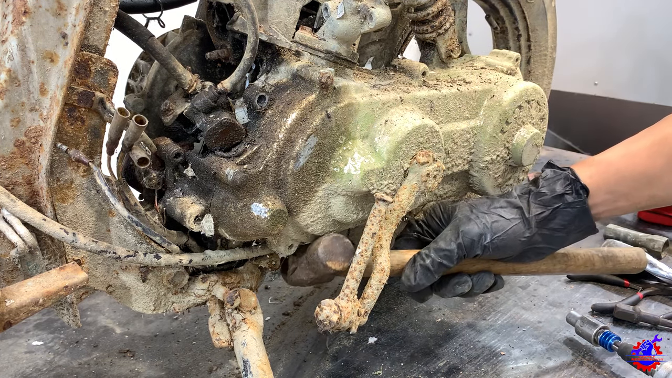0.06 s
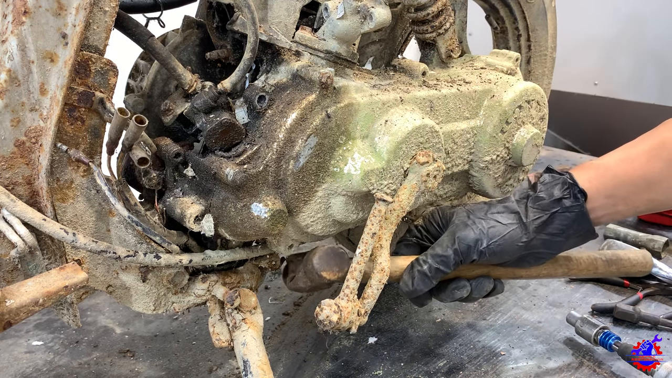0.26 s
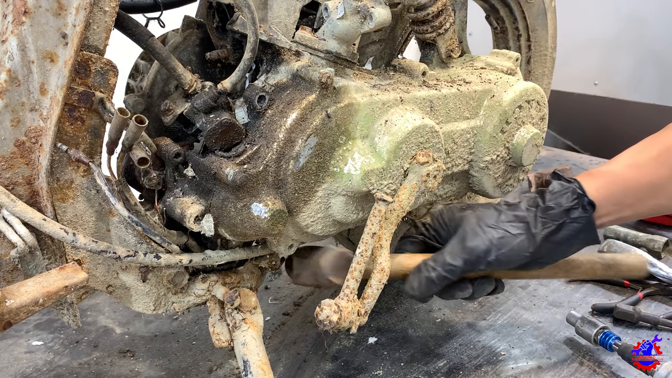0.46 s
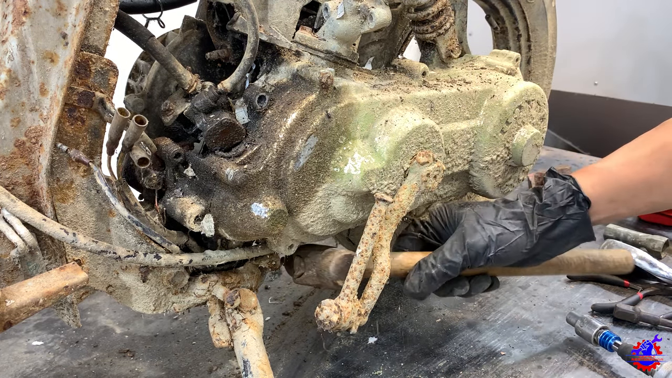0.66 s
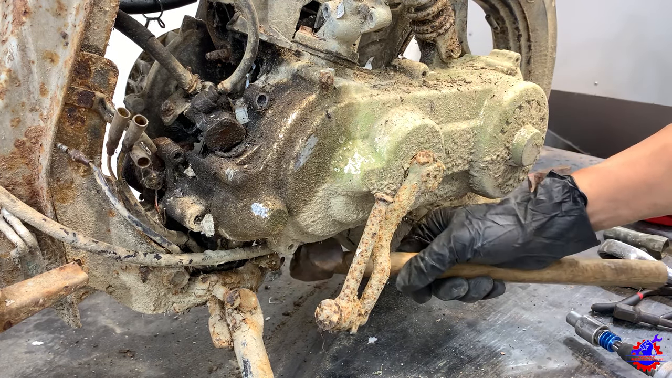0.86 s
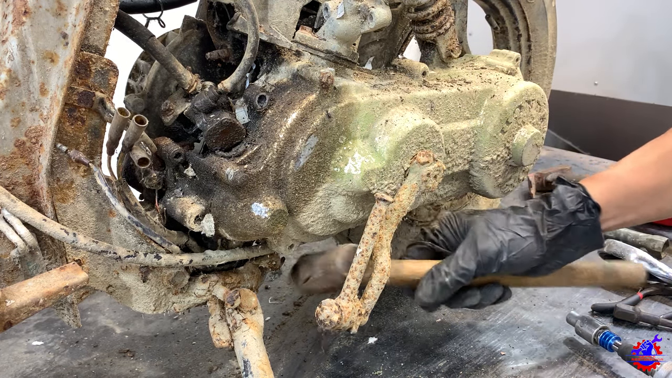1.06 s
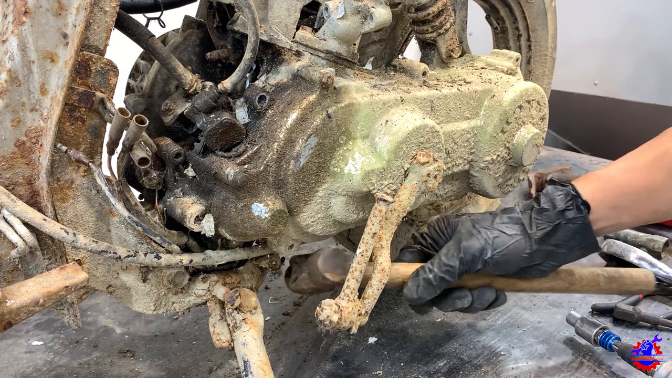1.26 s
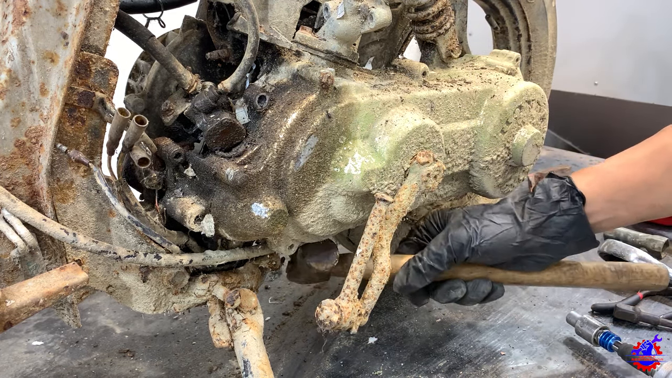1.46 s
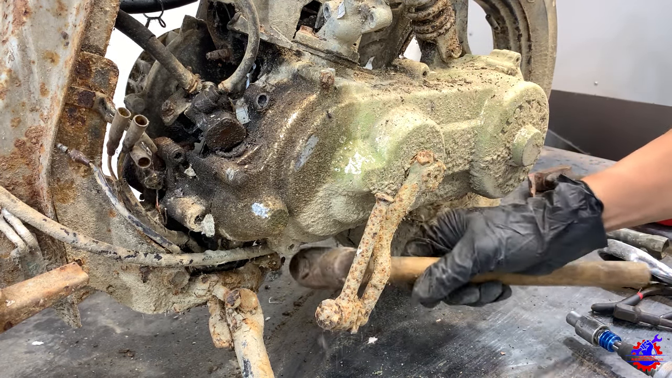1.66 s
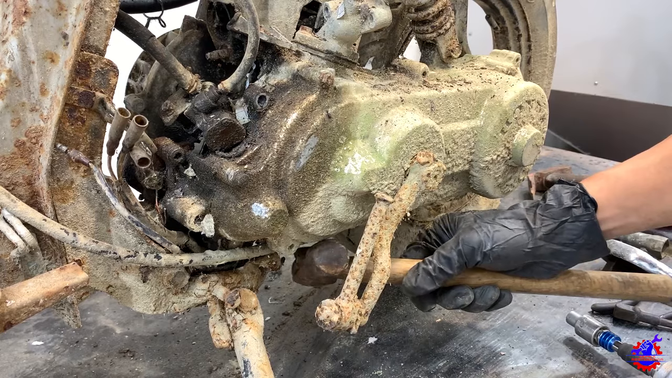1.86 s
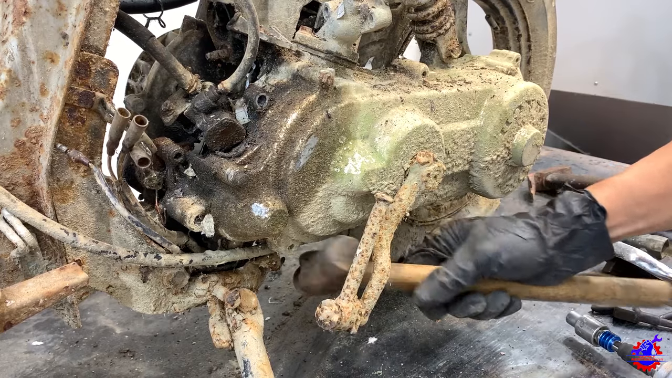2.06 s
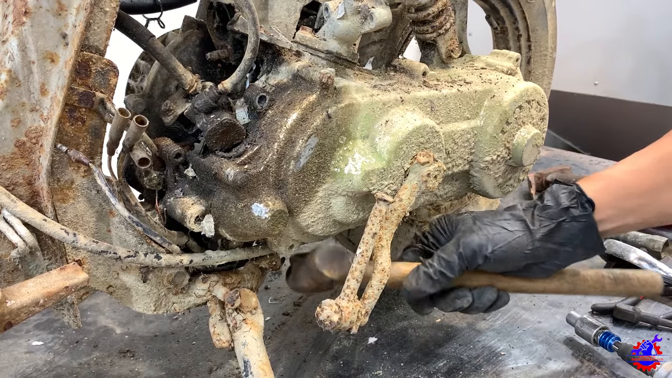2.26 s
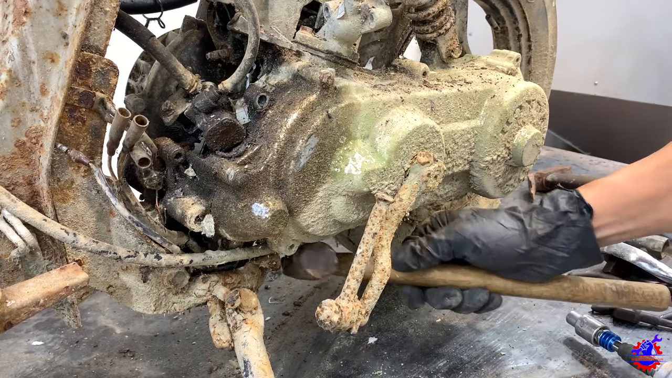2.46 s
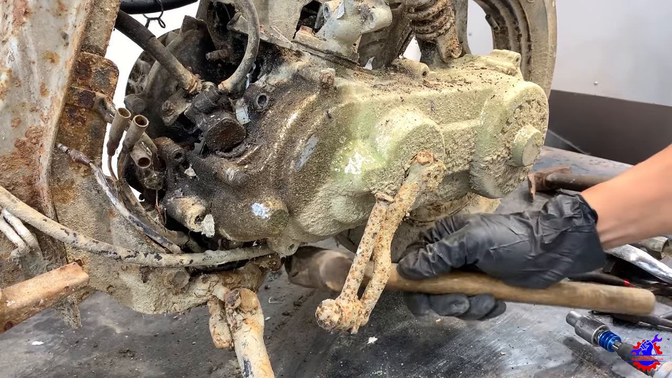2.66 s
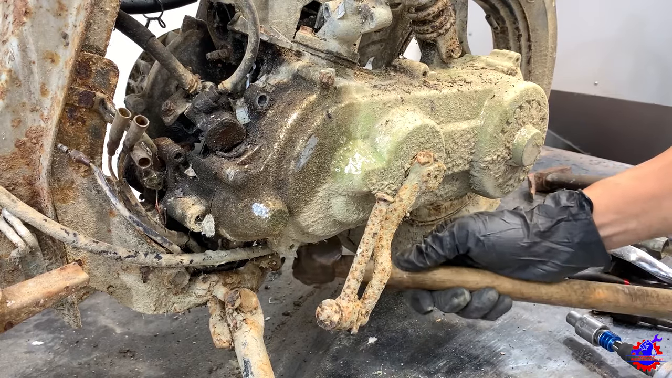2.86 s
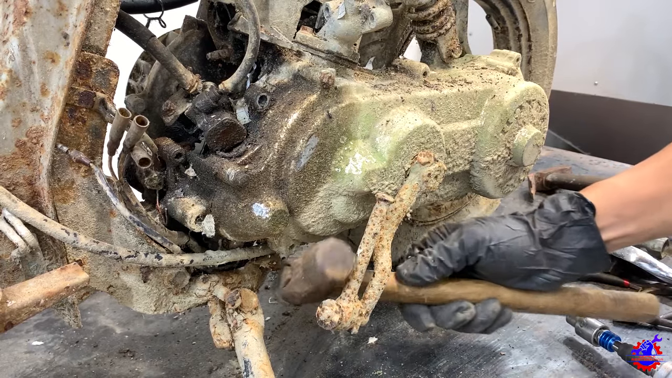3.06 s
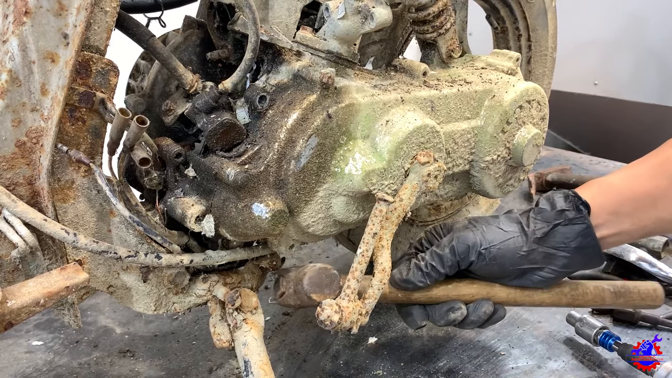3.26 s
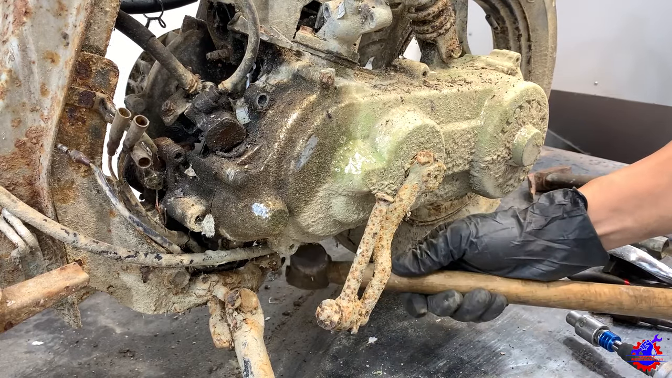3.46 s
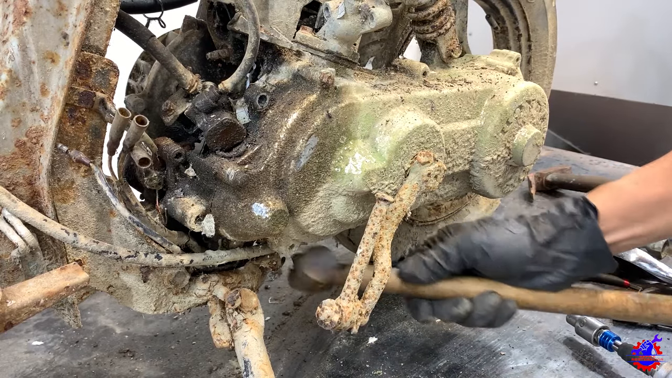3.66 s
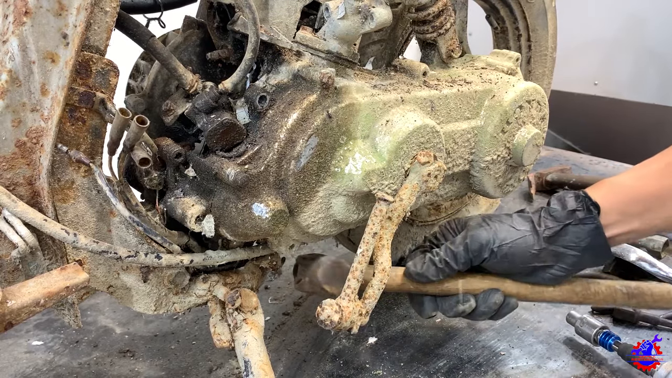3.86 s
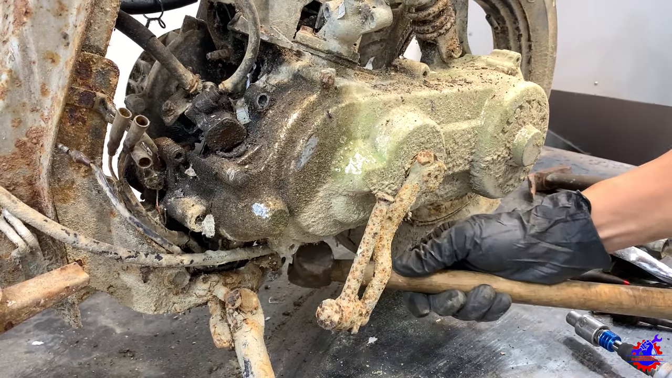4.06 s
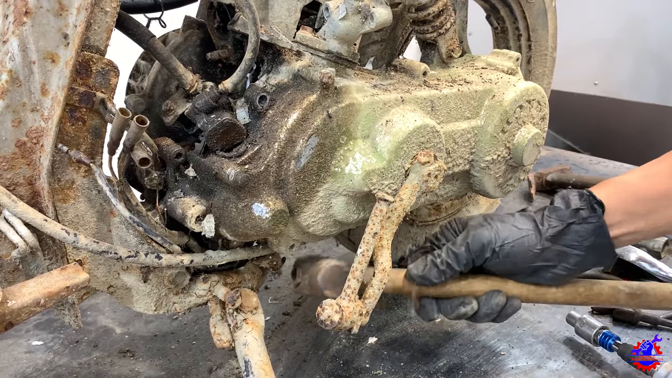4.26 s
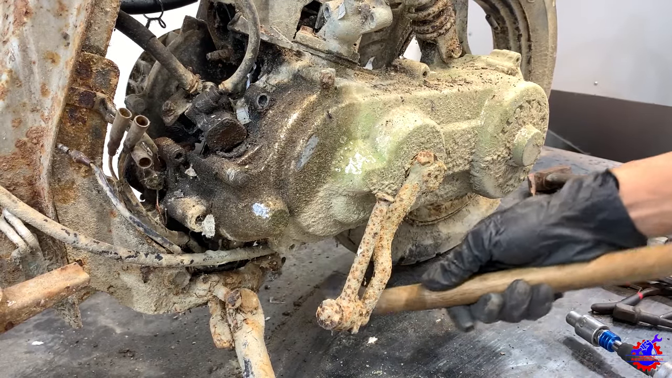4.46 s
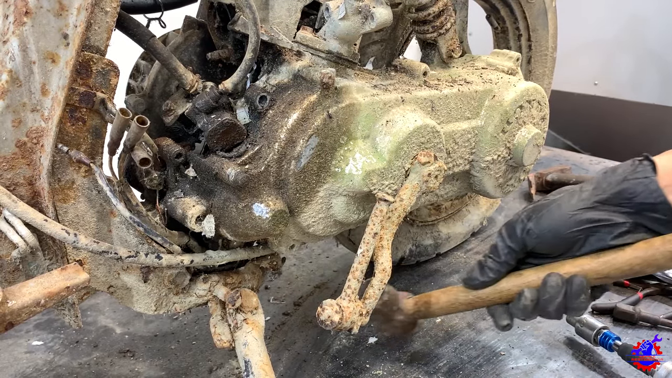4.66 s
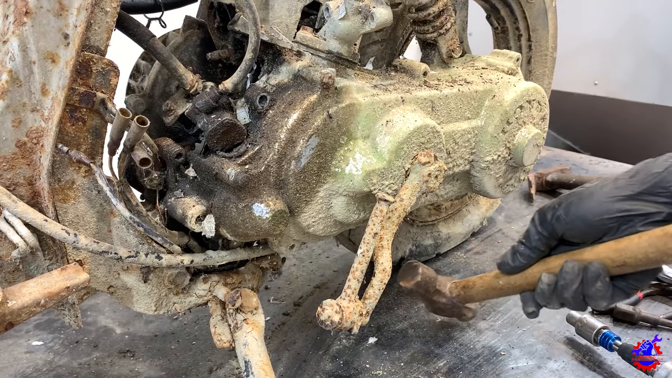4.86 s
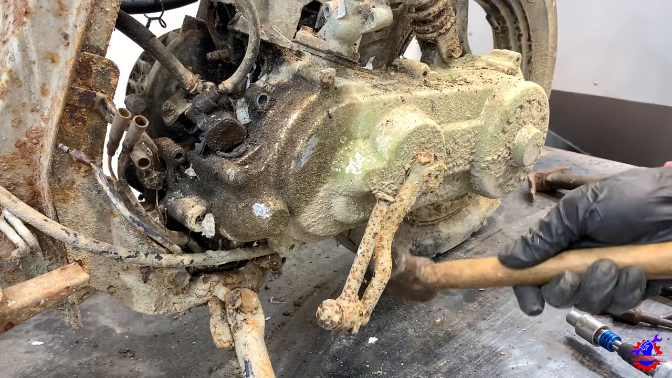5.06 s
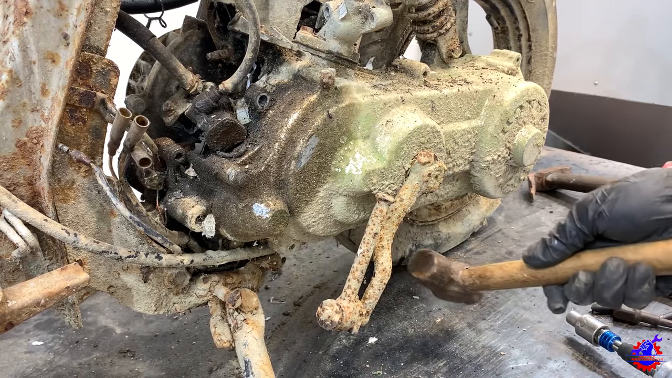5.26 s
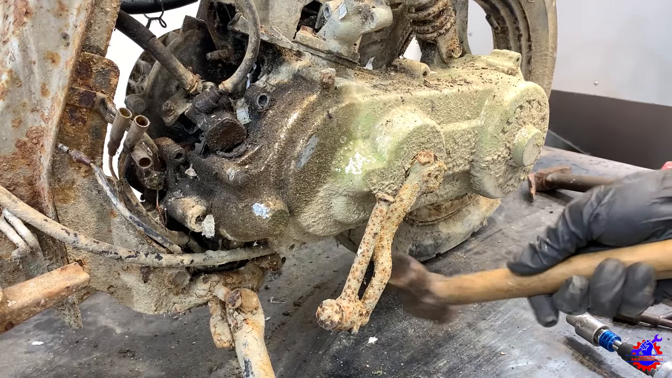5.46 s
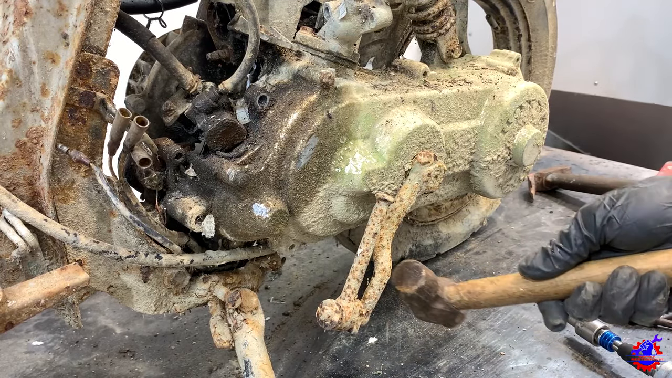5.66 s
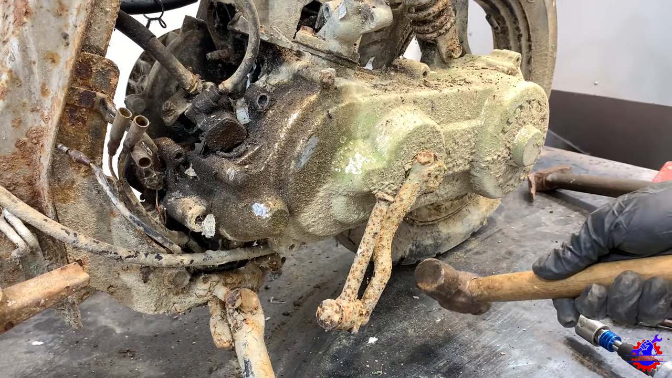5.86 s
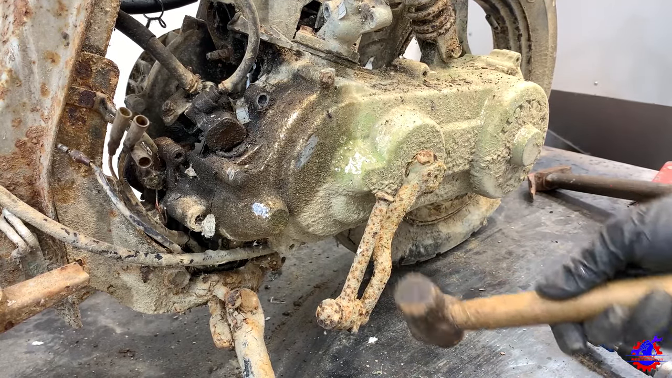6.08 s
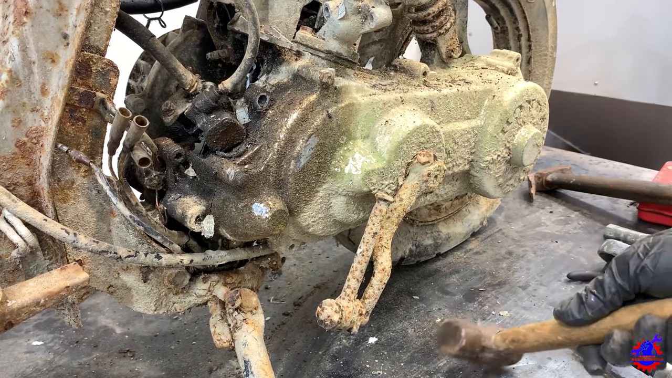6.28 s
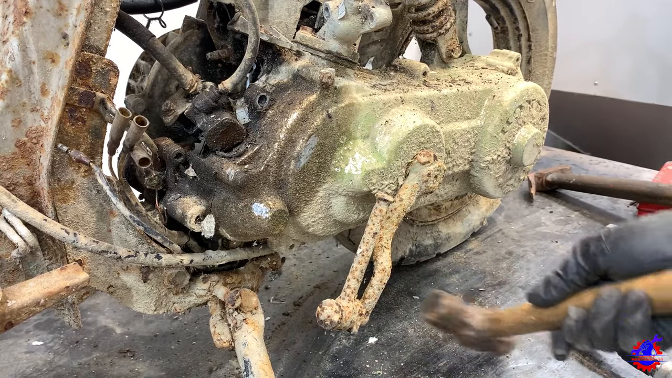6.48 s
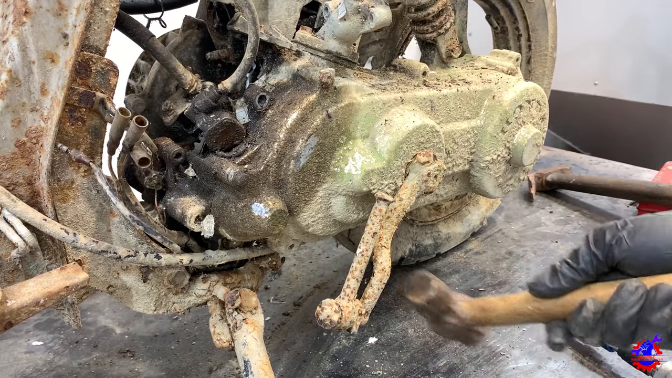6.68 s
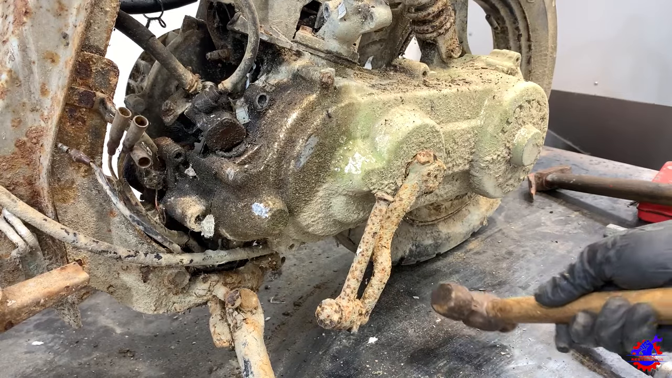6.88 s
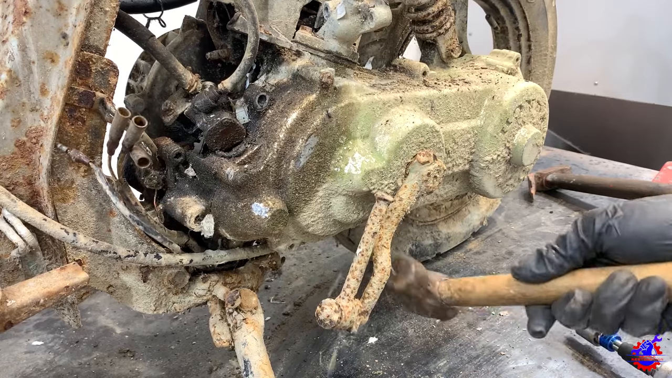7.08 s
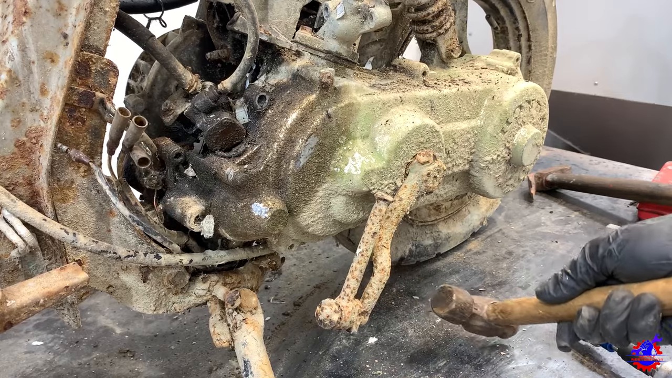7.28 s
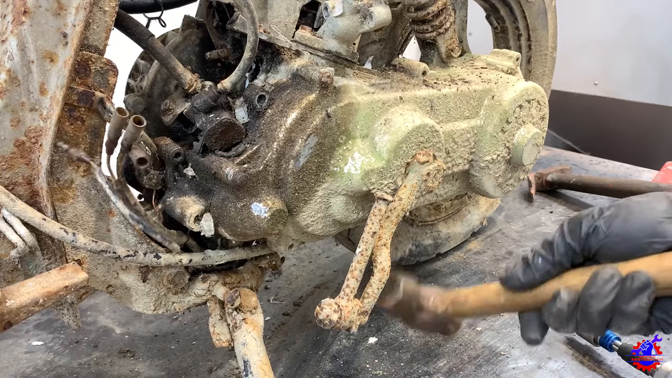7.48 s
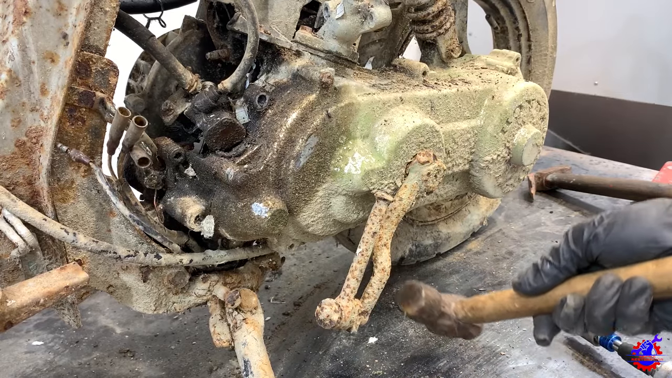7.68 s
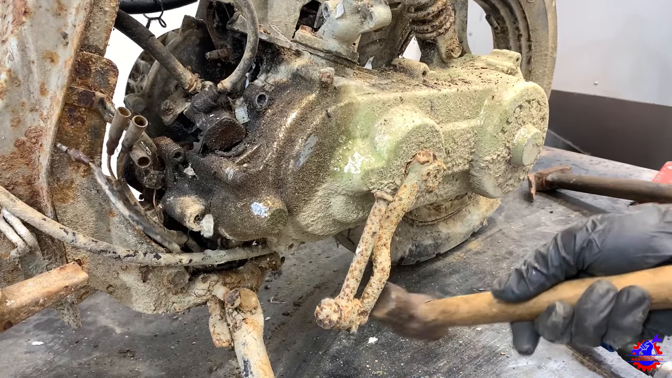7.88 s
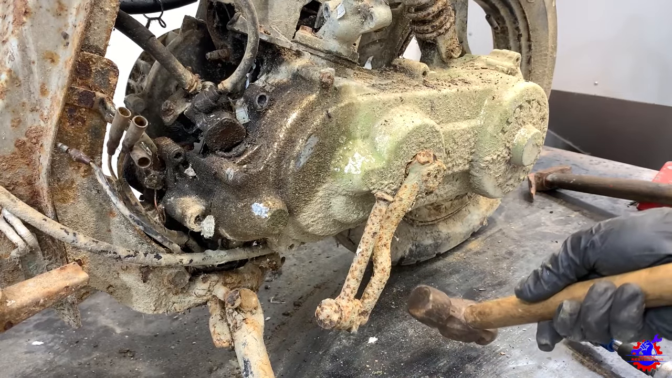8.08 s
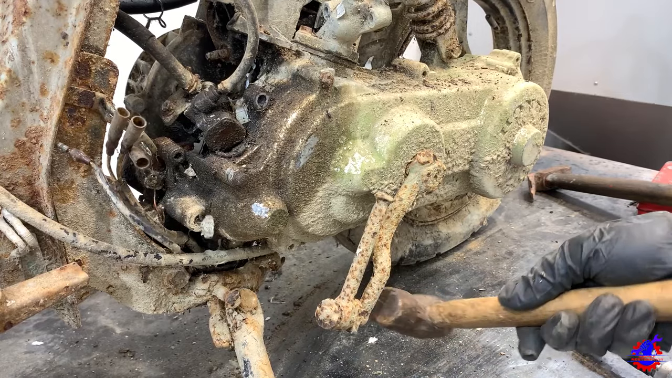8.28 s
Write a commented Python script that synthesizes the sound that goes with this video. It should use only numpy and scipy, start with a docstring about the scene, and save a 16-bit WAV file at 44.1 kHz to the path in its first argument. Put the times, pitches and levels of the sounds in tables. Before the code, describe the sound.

A hammer bangs a rusted steel lever on an engine casing, sixteen hard clanking blows half a second apart, in a ringing workshop, close and overloaded.

```python
"""In a workshop, a hammer beats a rusted lever on an engine casing: eight blows from behind, then eight from the front.
Each blow is a rattling noise burst that drives the steel, with its strong tones set by where the head lands.
A late boom shakes the bench and a loose part sings faintly; lighter knocks and ticks of grit fall around the blows.
Fading noise makes the room ring on, over quiet air. The close microphone overloads and its limiter ducks the tails."""
import sys
import numpy as np
from scipy import signal
from scipy.fft import rfft, irfft
from scipy.io import wavfile
from scipy.ndimage import uniform_filter1d, minimum_filter1d

SR = 44100
rng = np.random.default_rng(int(sys.argv[2]) if len(sys.argv) > 2 else 0)


def file_out(sig):
    """Save sig as 16-bit WAV at sys.argv[1]."""
    # one column per channel
    cols = np.atleast_2d(sig).T
    # limit, then scale
    lim = np.clip(cols, -1, 1)
    pcm = np.round(lim * 32767).astype(np.int16)
    wavfile.write(sys.argv[1], SR, pcm)


N = 367353  # length of the scene in samples

# still air of the workshop, its colour only: (frequency [Hz], relative level [dB])
AIR_COLOUR = [(25, -13), (60, -6), (100, -2), (150, -11.5), (200, 3), (320, -21), (500, -11), (700, -20),
              (1500, -26), (4000, -34.5), (11000, -38), (16000, -53)]
# how long the workshop rings: (frequency [Hz], time to fade by 60 dB [s])
ROOM_FADES = [(100, 0.32), (400, 0.95), (1200, 0.78), (3000, 0.86), (6000, 0.82), (10000, 0.66),
              (16000, 0.069)]
# broad colour of the casing: (frequency [Hz], relative level [dB])
CASING_COLOUR = [(90, -21.5), (150, -4), (195, 0.5), (260, -6.5), (430, -17.5), (650, -5), (850, -5),
                 (1350, -2), (2200, -4), (3200, -7), (4500, -11.5), (5700, -15.5), (8500, -20),
                 (10500, -20.5), (14000, -22.5), (17000, -45.5)]
# strongest modes (natural tones) of lever, casing and hammer head, as standing waves along the struck stretch:
# (frequency [Hz], width [Hz], relative level at an antinode [dB],
#  place of an antinode [0-1 along the stretch, beyond 1 lies past its end], distance between nodes [same places])
STEEL_MODES = [(1410, 370, 7.5, 0.12, 1.47), (2057, 150, 5, 0.23, 0.16), (2617, 270, 18.5, 0.2, 0.35),
               (3330, 150, 10.5, .69, 0.87), (4060, 590, 8.5, 0.51, 1.27), (4837, 530, 14, 0.52, 0.5),
               (6007, 142, 20.5, 0.789, 0.89), (7270, 260, 20.5, 1.23, 1.55), (10410, 620, 10, 0.49, 0.6)]
# boom of the bench: (frequency [Hz], width [Hz], relative level [dB])
BENCH_MODES = [(59.9, 22, 2), (82.9, 14, 4.5), (117, 34, -7.5), (153, 11, -8), (196.7, 12, -3.5),
               (241, 47, -6.5), (321.6, 11, -5)]
# a loose part that sings on: (frequency [Hz], relative level [dB], time to fade by 60 dB [s])
LOOSE_TONES = [(563, 3, 1.6), (563, -11, 0.95), (1520, -14, 3.3)]
# ticks of falling grit: (time [s], relative level [dB], relative ping level [dB])
GRIT_TICKS = [(0.047, -35.5, 2), (0.07, -33.5, 14.5), (0.385, -42, -7), (0.725, -35, 20.5),
              (0.941, -43.5, -7), (1.563, -44, -6.5), (2.083, -41, 5.5), (2.427, -45.5, 9.5),
              (2.517, -44, 2.5), (2.705, -41, 28)]
# light knocks of hammer and handle: (time [s], relative level [dB], bench thump gain [dB],
#  brightness [dB per octave], ping frequency [Hz], relative ping level [dB])
LIGHT_KNOCKS = [(0.366, -31.5, -20, 0, 2400, 0), (0.518, -24, -16, 5.5, 3194, 23),
                (1.493, -49.5, -20, -4, 196, 5.5), (2.338, -15, -12, -.5, 1990, 6.5),
                (2.904, -19, -23.5, 6, 4460, -1.5), (3.183, -23.5, -18, -2, 295, 26.5),
                (3.194, -23.5, -14, -3.5, 301, 16), (3.449, -32, -18, 2, 3200, 9.5),
                (3.696, -6, -6.5, -.5, 850, 8), (4.14, -21.5, -18, -1.5, 750, 7),
                (4.79, -47, -37, 2, 2170, 12.5)]
# hammer blows: (time [s], relative level [dB], place on the lever [0-1], brightness [dB per octave],
#  bench thump gain [dB], loose part gain [dB])
HAMMER_BLOWS = [(0.5404, -1.5, 0.35, 0.8, -5, -50.5), (1.1128, 0.5, 0.35, 0.85, -8, -65),
                (1.6413, 0, 0.41, 2, -8, -47), (2.1279, -2.5, 0.13, 0.14, -4.5, -77),
                (2.5659, 0.5, 0.39, 2, -6.5, -59.5), (3.017, 1, 0.4, 1.2, -5.5, -57),
                (3.7487, -0.5, .69, -0.7, -7.5, -56.5), (4.179, -0.2, 0.41, 1.43, -6, -52.5),
                (5.0871, -.5, 0.31, 1.56, -11, -76), (5.5332, -1.1, 0.29, 1.73, -10.5, -60.5),
                (6.0361, -3, 0.26, 2, -11, -77), (6.5871, -4.5, 0.93, .8, -12.5, -67),
                (7.0504, -3, 0.96, 2.5, -15.5, -62), (7.5096, -1.15, 0.78, 2, -14.5, -76),
                (7.9239, -3, .7, 0.6, -13.5, -72), (8.298, -2.5, .78, 1.6, -16, -75)]

AIR_DB = -63  # average level of the air noise before the microphone
GRIT_TILT_DB, GRIT_PING_HZ = 9, 7730  # brightness per octave and ping, shared by all grit
BLOW_DB, TAP_DB, ROOM_DB = 26.5, 26, 5.5  # gain of hard blows, of light contacts and of the room
BENCH_LAG_S = 0.004  # after a blow, the bench answers just after the crack
TOP_HZ = 15800  # upper limit of the microphone sound

SIZE = 8192  # samples in a filter or a burst
HZ = np.maximum(np.arange(SIZE // 2 + 1) * SR / SIZE, 1)  # the frequencies of a filter


def undb(db):
    """Turn decibels into a gain."""
    return 10 ** (np.asarray(db) / 20)


def along(points, hz):
    """Read between (Hz, value) points on a log-frequency axis."""
    point_hz, value = np.transpose(points)
    return np.interp(np.log(hz), np.log(point_hz), value)


def response(db):
    """Make a filter that starts at once and has the given gain at each frequency."""
    cepstrum = irfft(np.log(undb(db)))
    # folding the second half onto the first leaves no sound before the start
    cepstrum[1:SIZE // 2] *= 2
    cepstrum[SIZE // 2 + 1:] = 0
    return irfft(np.exp(rfft(cepstrum)))


def fade(t, t60):
    """Die away smoothly, 60 dB down after t60 seconds."""
    return np.exp(-np.log(1000) * t / t60)


def convolve(x, h):
    """Filter each channel."""
    return signal.fftconvolve(np.atleast_2d(x), np.atleast_2d(h), axes=1)


def add(track, s, sound):
    """Mix a sound into the track at time s, cut off at the end of the scene."""
    start = max(int(s * SR), 0)
    part = sound[..., :max(N - start, 0)]
    track[..., start:start + part.shape[-1]] += part


def resonance(hz, width):
    """Power response of one mode, 1 at its centre."""
    detune = (HZ / hz - hz / HZ) * hz / width
    return 1 / (1 + detune ** 2)


def diffuse(count, apart_hz):
    """Noise from all sides: long waves reach both microphone ports alike, short ones differ."""
    mid, side = rng.standard_normal((2, count))
    keep_short_waves = signal.butter(1, min(apart_hz, 5000), "high", fs=SR, output="sos")
    side = signal.sosfilt(keep_short_waves, side)
    return np.array([mid + side, mid - side]) / np.sqrt(2)


def air():
    """Quiet room noise, mostly low."""
    noise = convolve(diffuse(N, apart_hz=621), response(along(AIR_COLOUR, HZ)))[:, :N]
    return noise * undb(AIR_DB) / noise.std()


def workshop(x, early_db, early_t60, treble_db):
    """The walls return early reflections and a diffuse tail, fading at its own rate in each frequency band."""
    t = np.arange(int(1.4 * SR)) / SR
    noise = rfft(diffuse(len(t), apart_hz=549))
    hz = np.maximum(np.arange(noise.shape[1]) * SR / len(t), 1)
    centres_hz = np.array(ROOM_FADES)[:, 0]
    treble = undb(treble_db * hz / 10000)  # treble_db is reached at 10 kHz
    tail = 0
    # each band overlaps its neighbours: weight 1 at its own centre, 0 at the others
    for weights, (_, t60) in zip(np.eye(len(ROOM_FADES)), ROOM_FADES):
        band = along(np.c_[centres_hz, weights], hz) * treble
        decay = fade(t, t60) + undb(early_db) * fade(t, early_t60)
        tail = tail + irfft(noise * band, len(t)) * decay
    build_up = 1 - np.exp(-t / 0.0029)
    return convolve(x, tail * build_up / np.sqrt(SR))[:, :N]


def fine_modes(fine_hz, width_hz, spread_db, depth):
    """The ribbed casing has many close modes; each contact wakes them in other shares (dB about the broad colour)."""
    shares = undb(spread_db * rng.standard_normal(len(fine_hz))) ** 2
    widths = width_hz * np.sqrt(fine_hz[:, None] / 2000)
    power = shares @ resonance(fine_hz[:, None], widths) + 1e-6
    ripple = (power / uniform_filter1d(power, size=161)) ** depth
    fade_in = np.clip(HZ / 400 - 1, 0, 1)  # none below 400 Hz, full from 800 Hz
    return 10 * np.log10(ripple / uniform_filter1d(ripple, size=161)) * fade_in


def steel_ring(fine_hz, tilt_db, modes, mode_db):
    """The casing answers one contact, with the strong modes standing out of its broad colour."""
    strong = sum(undb(db) ** 2 * resonance(hz, width) for (hz, width), db in zip(modes, mode_db))
    tilt = tilt_db * np.log2(np.maximum(HZ, 300) / 2500)  # pivots at 2500 Hz, flat below 300 Hz
    colour_db = along(CASING_COLOUR, HZ) + tilt + 10 * np.log10(1 + strong)
    return response(colour_db + fine_modes(fine_hz, width_hz=23, spread_db=13, depth=0.45))


def chatter(rise_s, contact_s, near_db, near_t60):
    """The loose lever rattles unevenly in its play for milliseconds; frame and bench top scatter the sound."""
    t = np.arange(SIZE) / SR
    contact = np.exp(-(t / contact_s) ** 4)
    scatter = undb(near_db) * fade(t, near_t60)
    shape = (contact + scatter) * (1 - np.exp(-(t / rise_s) ** 2))
    step = 64  # samples between changes of rattle strength
    slips = np.interp(t, t[::step], undb(1.7 * rng.standard_normal(SIZE // step)))
    burst = diffuse(SIZE, apart_hz=1300) * shape * slips
    return burst * np.sqrt(2 / np.sum(burst ** 2))  # same energy every time


def thump(t60, rise_s):
    """The engine rocks on its bench, which booms long and low at its own modes."""
    t = np.arange(SR) / SR
    power = sum(undb(db) ** 2 * resonance(hz, width) for hz, width, db in BENCH_MODES)
    # weaken everything above 450 Hz and below 40 Hz
    power = power / (1 + (HZ / 450) ** 4) / (1 + (40 / HZ) ** 4)
    shake = diffuse(SR, apart_hz=750) * fade(t, t60) * (1 - np.exp(-t / rise_s))
    return convolve(shake, response(10 * np.log10(power)))


def singing():
    """A loose part sings fading pure tones, renewed by every blow."""
    t = np.arange(2 * SR) / SR
    return sum(undb(db) * fade(t, t60) * np.sin(2 * np.pi * hz * t) for hz, db, t60 in LOOSE_TONES)


def mode_levels(place):
    """A blow drives each steel mode fully at an antinode, hardly at a node."""
    _, _, db, antinode, spacing = np.transpose(STEEL_MODES)
    motion = np.cos(np.pi * (place - antinode) / spacing)
    return db + 10 * np.log10(motion ** 2 + 1e-6)


def tap_ring(fine_hz, db, tilt_db, ping_hz, ping_db):
    """A light contact wakes the casing and one ping."""
    ping = (ping_hz, 40 + ping_hz / 60)  # frequency and width in Hz
    return undb(db + TAP_DB) * steel_ring(fine_hz, tilt_db, [ping], [ping_db])


def grit(fine_hz):
    """Flakes of rust and dirt land with bright ticks; gives the near sound and the sound sent to the room."""
    direct, radiated = np.zeros((2, N)), np.zeros(N)
    for s, db, ping_db in GRIT_TICKS:
        ring = tap_ring(fine_hz, db, GRIT_TILT_DB, GRIT_PING_HZ, ping_db)
        tick = chatter(rise_s=0.00063, contact_s=0.0019, near_db=-11.5, near_t60=0.18)
        add(direct, s, convolve(tick, ring))
        add(radiated, s, ring)
    return direct, radiated


def knocks(fine_hz):
    """Hammer and handle bump the casing and nudge the bench; gives the near sound and the sound sent to the room."""
    direct, radiated = np.zeros((2, N)), np.zeros(N)
    for s, db, thump_db, tilt_db, ping_hz, ping_db in LIGHT_KNOCKS:
        ring = tap_ring(fine_hz, db, tilt_db, ping_hz, ping_db)
        bump = chatter(rise_s=0.00098, contact_s=0.004, near_db=-10, near_t60=0.13)
        add(direct, s, convolve(bump, ring))
        add(direct, s, undb(thump_db) * thump(t60=0.34, rise_s=0.003))
        add(radiated, s, ring)
    return direct, radiated


def blows(fine_hz):
    """Hard blows ring the steel, rock the bench and renew the loose tones; gives near sound and sound for the room."""
    direct, radiated = np.zeros((2, N)), np.zeros(N)
    modes = [row[:2] for row in STEEL_MODES]
    tones = singing()
    for s, db, place, tilt_db, thump_db, loose_db in HAMMER_BLOWS:
        ring = undb(db + BLOW_DB) * steel_ring(fine_hz, tilt_db, modes, mode_levels(place))
        crack = chatter(rise_s=0.002, contact_s=0.0072, near_db=-13, near_t60=0.08)
        add(direct, s, convolve(crack, ring))
        add(direct, s + BENCH_LAG_S, undb(thump_db) * thump(t60=0.69, rise_s=0.0013))
        add(direct, s, undb(loose_db) * tones)
        add(radiated, s, ring)
    return direct, radiated


def scene():
    """Grit, knocks and blows sound directly and through the room, over still air."""
    # 150 close casing modes, slightly unevenly spaced
    fine_hz = np.geomspace(500, 15000, 150) * (1 + 0.008 * rng.standard_normal(150))
    sources = [grit(fine_hz), knocks(fine_hz), blows(fine_hz)]
    direct, radiated = (sum(parts) for parts in zip(*sources))
    room = workshop(radiated, early_db=5.5, early_t60=0.1, treble_db=-1.5)
    return direct + undb(ROOM_DB) * room + air()


def limiter(x, top_db, ratio, attack_s, hold_s, release_s):
    """Turn both channels down after a loud peak, hold, then come back up."""
    peak = np.abs(x).max(axis=0)
    over_db = 20 * np.log10(np.maximum(peak / undb(top_db), 1))
    cut_db = -over_db * (1 - 1 / max(ratio, 1))
    attack, hold, release = (max(int(s * SR), 2) for s in (attack_s, hold_s, release_s))
    # the shifted windows look only at sound that has already come
    held = minimum_filter1d(cut_db, hold, origin=(hold - 1) // 2)
    quick, slow = (uniform_filter1d(held, k, origin=(k - 1) // 2) for k in (attack, release))
    return x * undb(np.minimum(quick, slow))


def record(dry):
    """The microphone rounds off loud peaks, the limiter ducks, and the top is cut."""
    ceiling = undb(0)
    ports = dry * undb(np.array([[-0.5], [0.5]]))  # the second port is 1 dB louder
    overloaded = ceiling * np.tanh(ports / ceiling)
    limited = limiter(overloaded, top_db=-6.0, ratio=7.7, attack_s=0.0027, hold_s=0.11, release_s=0.09)
    top_cut = signal.ellip(8, 0.2, 70, TOP_HZ, fs=SR, output="sos")
    return signal.sosfilt(top_cut, limited)


dry = scene()
out = record(dry)
file_out(out)
```